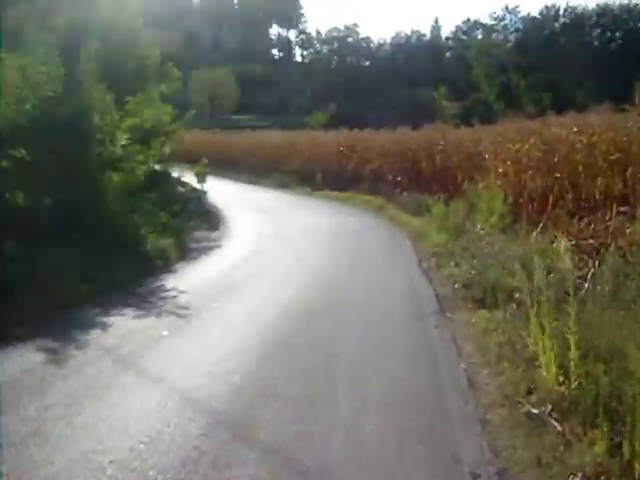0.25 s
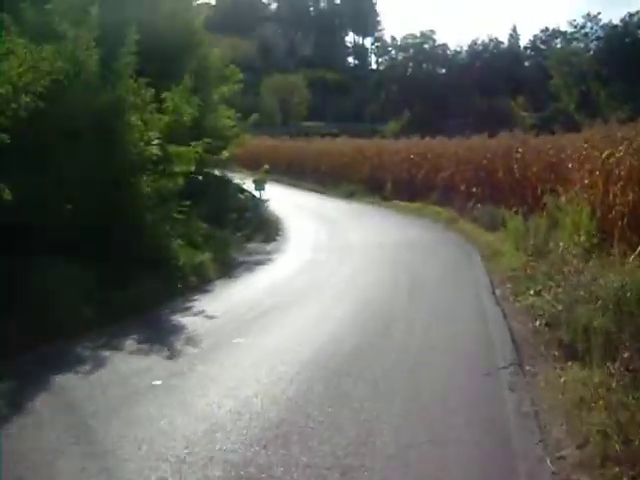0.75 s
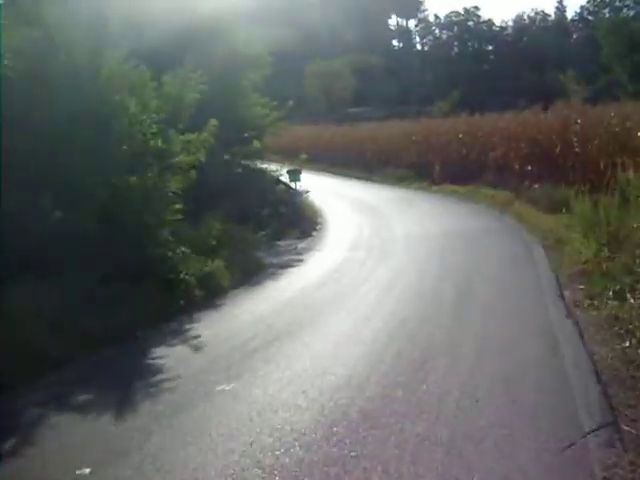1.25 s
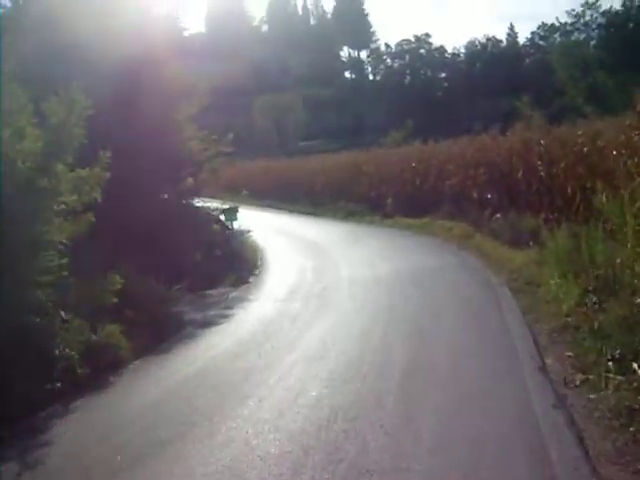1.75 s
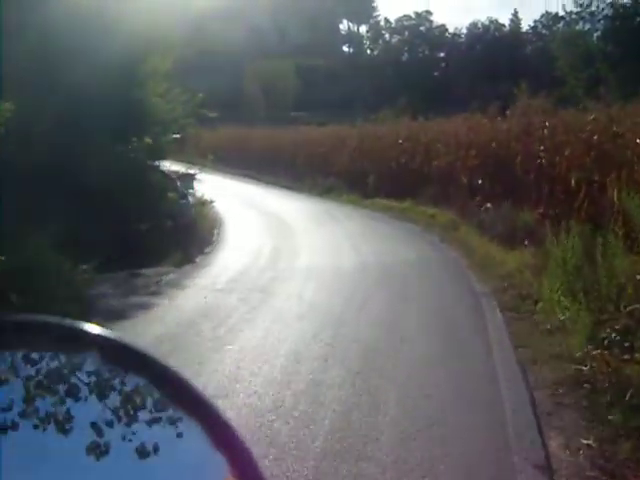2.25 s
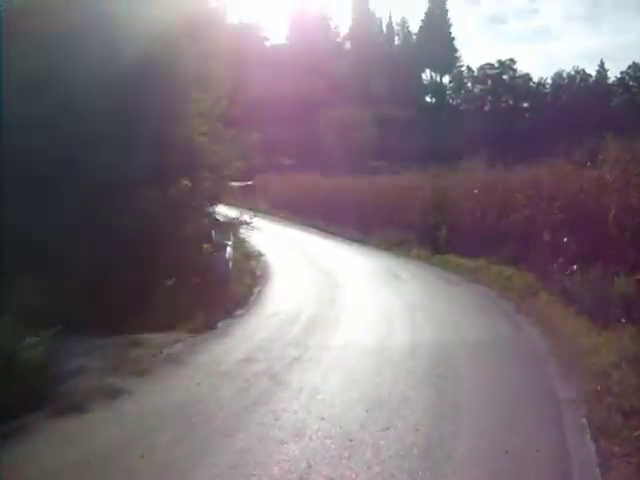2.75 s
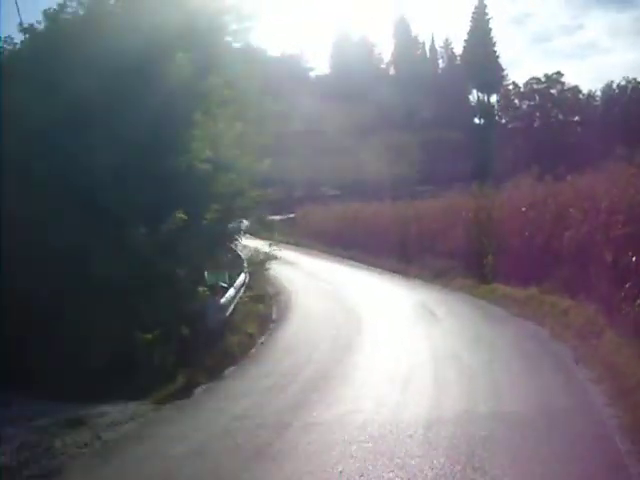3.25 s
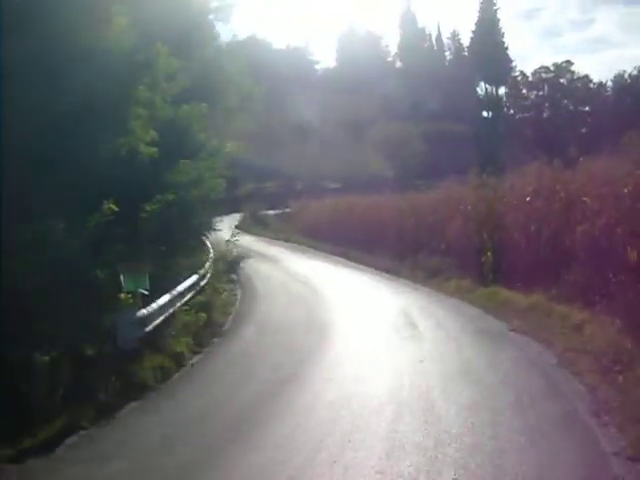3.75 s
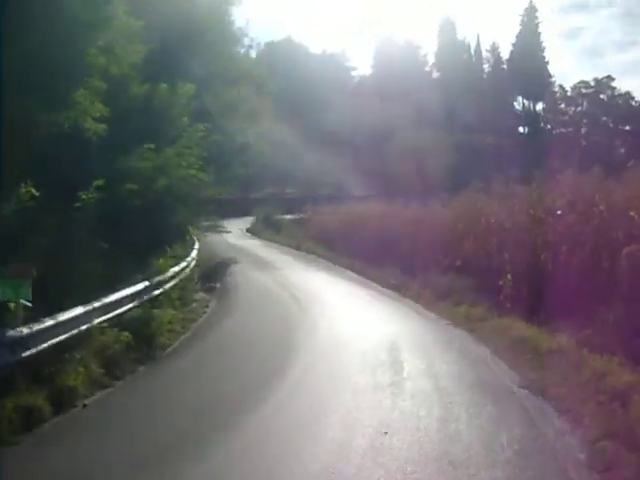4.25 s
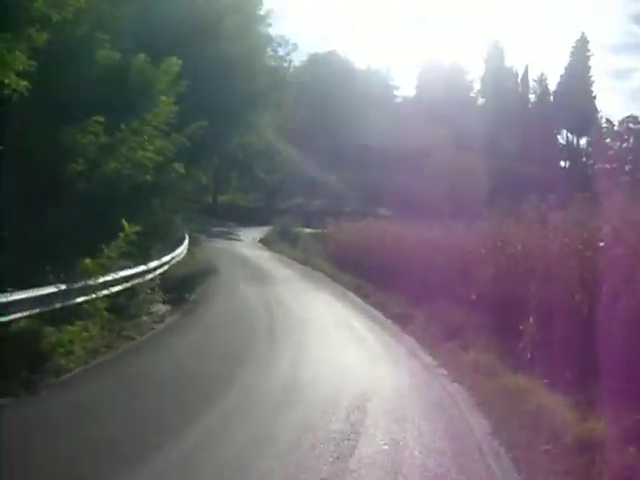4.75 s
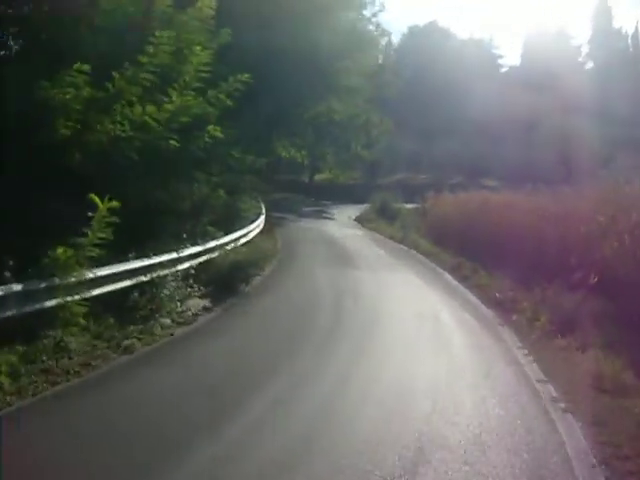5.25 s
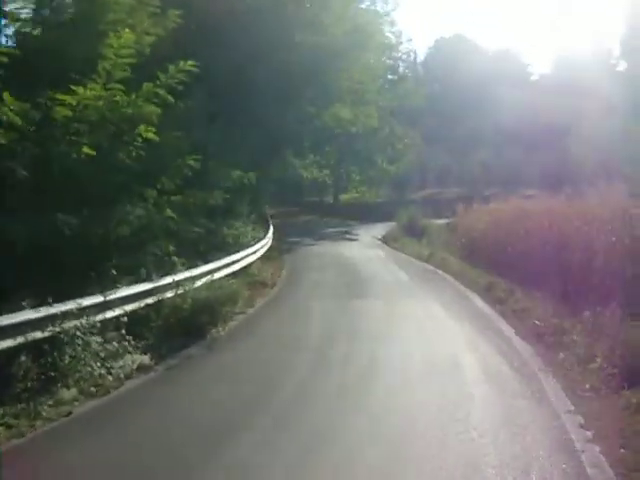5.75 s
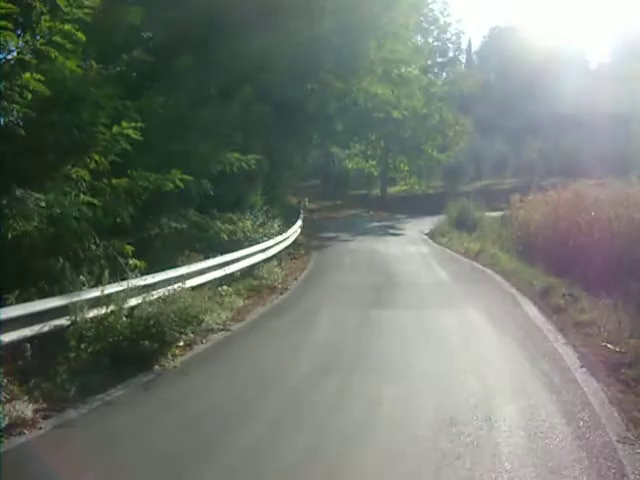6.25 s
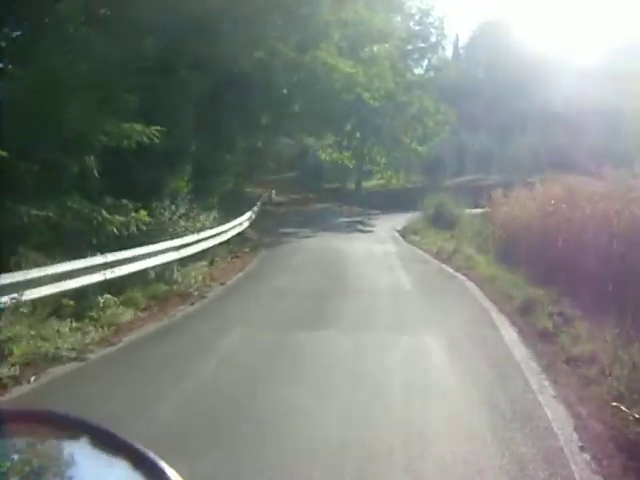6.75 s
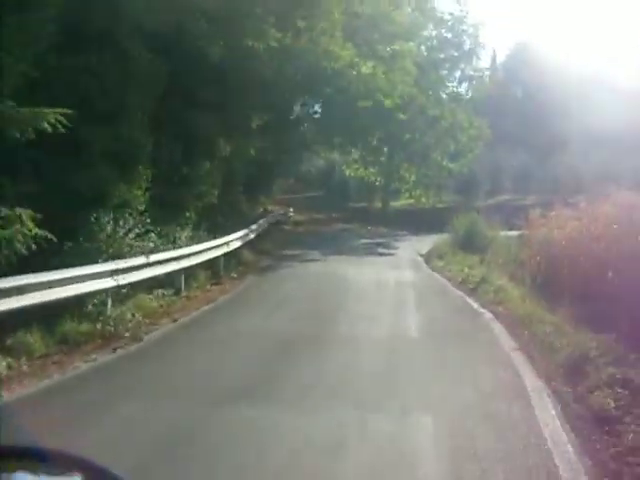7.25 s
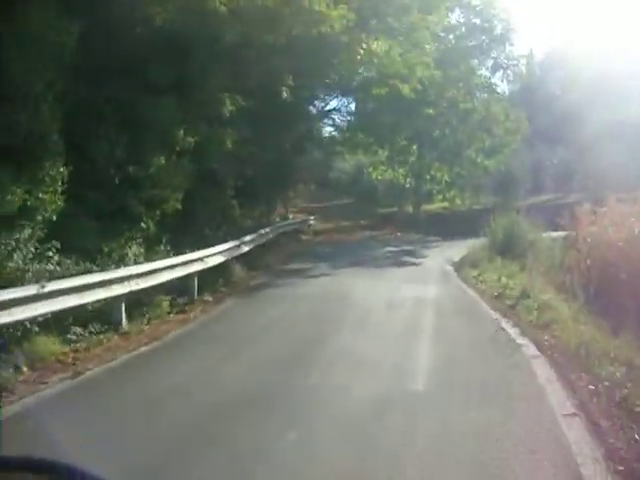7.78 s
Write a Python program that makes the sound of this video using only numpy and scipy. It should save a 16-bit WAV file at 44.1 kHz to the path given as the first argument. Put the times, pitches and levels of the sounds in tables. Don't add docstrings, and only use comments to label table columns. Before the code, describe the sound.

A small two-stroke engine drones close by on an open country road, raspy and rattling, pitch dipping slightly then rising for about four seconds before settling into a steady buzz. Gusts batter the small microphone, mostly early on, with pops and clipped rumble; two tiny bracket squeaks chirp near the start. The sound is dull, narrow and distorted, with almost no high treble.

```python
import sys
import numpy as np
from scipy import signal
from scipy.fft import rfft, irfft, next_fast_len
from scipy.io import wavfile
from scipy.ndimage import uniform_filter1d

SR = 44100
rng = np.random.default_rng(int(sys.argv[2]) if len(sys.argv) > 2 else 0)


def convert_level_to_amplitude(level_db):
    exponent = np.asarray(level_db, float) / 20
    return 10 ** exponent


def materialize(psi):
    bounded = np.clip(np.atleast_2d(psi).T, -1, 1)
    quanta = np.round(bounded * 32767).astype(np.int16)
    wavfile.write(sys.argv[1], SR, quanta)


N = 353682


def rms_one(x):
    return x / np.sqrt(np.mean(x ** 2) + 1e-20)


def evened(x, span_s):
    return rms_one(x / np.sqrt(uniform_filter1d(x ** 2, int(span_s * SR)) + 0.036))


def in_time(rows):
    s, *columns = np.transpose(rows)
    return [np.interp(np.arange(N) / SR, s, c) for c in columns]


def at_hz(points, hz):
    known_hz, level_db = np.array(points).T[:2]
    return np.interp(np.log(hz), np.log(known_hz), level_db)


def with_speed(rule, rate):
    cruise_per_s = 67
    return rule[0] + rule[1] * (rate - cruise_per_s)


def drift(rate):
    hop = 40
    r = np.exp(-2 * np.pi * rate * hop / SR)
    slow = signal.lfilter([1], [1, -2 * r, r * r], rng.standard_normal(N // hop + 2002))[2000:]
    return np.interp(np.arange(N) / hop, np.arange(len(slow)), rms_one(slow))


def coloured(spectrum, patchy_db, rate):
    size = next_fast_len(N)
    white = rfft(rng.standard_normal(size))
    hz = np.maximum(np.fft.rfftfreq(size, 1 / SR), 1)
    white = white * convert_level_to_amplitude(at_hz(spectrum, hz)) * (hz > 20)
    out = np.zeros(N)
    for centre in np.arange(4.5, 12.6, .5):
        share = np.clip(1 - 2 * np.abs(np.log2(hz) - centre), 0, 1)
        out += irfft(white * share, size)[:N] * convert_level_to_amplitude(patchy_db * drift(rate))
    return rms_one(out)


def resonate(x, hz, width_hz):
    r = np.exp(-np.pi * width_hz / SR)
    zeros = np.array([1, 0, -1]) * (1 - r * r) / 2
    poles = [1, -2 * r * np.cos(2 * np.pi * hz / SR), r * r]
    return signal.lfilter(zeros, poles, x)


def order_tones(rate, turns, wobble_db):
    # multiple of crank rate, level/dB
    ports = [(1, -20), (2, -1), (3, -5.5), (4, -13.5), (5, -13), (6, -1.5), (7, -3), (8, -10.5), (9, 0),
             (10, -8), (11, -7.5), (12, 2), (13, 0), (14, -3), (15, -8), (16, 2), (17, -4), (18, -1),
             (19, -1.5), (20, -20), (21, 3), (22, 2.5), (23, -13), (24, -17), (25, 2), (26, -6), (29, -5),
             (33, 1.5), (36, -3.5)]
    # f/Hz, gain/dB
    silencer = [(380, -1), (500, 4), (640, -4.5), (900, -7), (1040, -0.5), (1110, -11.5), (1500, -20.5),
                (2500, -9.5)]
    scatter_rad = np.maximum(with_speed((2.2, .12), rate), .85)
    out = np.zeros(N)
    uneven = .008 * drift(14)
    for k, level_db in ports:
        gain = convert_level_to_amplitude(level_db + at_hz(silencer, k * rate) + wobble_db * drift(9))
        phase = 2 * np.pi * k * (turns + uneven / np.sqrt(k))
        phase = phase + scatter_rad * (rng.standard_normal() + .35 * drift(1.71))
        out += gain * np.cos(phase)
    return out / 2


def gas_roar(turns, pulsing):
    # f/Hz, level/dB per Hz
    roar = [(30, 1.5), (90, -23), (200, -20), (330, -16), (450, 0), (700, -1), (1000, 0), (1150, -8),
            (1500, -12.5), (2200, -11), (3000, -23.5), (4500, -16.5)]
    gate = 1 + pulsing * (np.cos(6 * np.pi * turns) + .5 * np.cos(2 * np.pi * turns))
    return rms_one(coloured(roar, patchy_db=-1.0, rate=25.0) * gate)


def clatter(rate, turns, spread_db, rattle_per_s):
    # f/Hz, width/Hz, rattle level/dB, slap level/dB
    metal = [(1500, 210, -9, 9), (1950, 260, 1, 10), (2460, 320, 1.5, 22), (2810, 180, -2, 10.5),
             (3447, 240, -1.5, 12.5), (3676, 110, -4, 23)]
    slap_rule_db = with_speed((-2, -.5), rate)
    slaps = np.flatnonzero(np.diff(np.floor(turns + .3 + .03 * drift(40))) > 0)
    strength = np.clip(rng.standard_normal((len(slaps), len(metal) + 1)), -2, 1.5)
    sizes = convert_level_to_amplitude(3.6 * np.minimum(rng.exponential(1, N), 4)) * rng.choice([-1, 1], N)
    rattle = rms_one(sizes * (rng.random(N) < rattle_per_s / SR))
    throb = 1 + .3 * np.cos(4 * np.pi * turns)
    out = np.zeros(N)
    for k, (hz, width_hz, rattle_db, slap_db) in enumerate(metal):
        blows = convert_level_to_amplitude(rattle_db) * np.roll(rattle, 5000 * k) * throb
        chance_db = spread_db * (1.8 * strength[:, k] + 0.33 * strength[:, -1])
        blows[slaps] += convert_level_to_amplitude(slap_db + slap_rule_db[slaps] + chance_db)
        out += resonate(blows, hz, width_hz) / np.sqrt(width_hz)
    return rms_one(out)


def gear_whine(rate):
    mesh_teeth, clutch_lag_s = 14.55, .55
    keep = np.exp(-1 / (clutch_lag_s * SR))
    road = rate[0] + signal.lfilter([1 - keep], [1, -keep], rate - rate[0])
    waver_hz = 1.5 * drift(5)
    level_db = with_speed((-24, 1.1), road) + 1.4 * drift(1.7)
    return convert_level_to_amplitude(level_db) * np.sin(2 * np.pi * np.cumsum(mesh_teeth * road + waver_hz) / SR)


def squeaks():
    # t/s, f/Hz, length/s, level/dB
    chirps = [
        (0.726, 1547, 0.03, -25),
        (0.805, 1590, 0.032, -24),
    ]
    t, out = np.arange(N) / SR, np.zeros(N)
    for s, hz, length, level_db in chirps:
        bump = np.exp(-((t - s - length / 2) / length * 2) ** 4)
        out += convert_level_to_amplitude(level_db) * bump * np.sin(2 * np.pi * hz * t)
    return out


def wind(lumpy_db):
    # t/s, peak level/dB, width/s, brightness/dB
    gust_events = [(0.121, -21.5, 0.04, -15.5), (0.157, -13.5, 0.012, -3.5), (0.291, -12, 0.035, -8),
                   (0.346, -13.5, 0.05, -1), (0.442, -14, 0.042, -3.5), (0.509, -13.5, 0.061, 0.5),
                   (0.608, -13.5, 0.0071, -5), (0.688, -8.5, 0.0061, -0.5), (0.955, -13.5, 0.019, 2.5),
                   (1.065, -10.5, 0.011, 0.5), (1.096, -5, 0.015, 28), (1.271, -6.5, 0.046, 3.0),
                   (1.36, -6.5, 0.042, 1.5), (1.442, -14.5, 0.089, 4.5), (2.08, -19, 0.17, 0),
                   (2.275, -15.5, 0.074, 12), (2.345, -15.5, 0.11, 2), (2.432, -13.5, 0.084, 1.5),
                   (2.522, -12, 0.04, 7), (2.637, -9, 0.11, 6), (3.061, -16, 0.074, 7),
                   (3.156, -17, 0.13, 2.5), (3.296, -13, 0.088, -2.5), (3.413, -2.5, 0.12, -3.5),
                   (4.458, -15, 0.068, -5), (5.069, -16.5, 0.02, 5), (5.824, -3, 0.016, 8),
                   (5.869, -10, 0.028, 8.5), (6.918, -16, 0.021, 3.5), (7.47, -23, 0.2, 7.5)]
    # t/s, level/dB
    airflow = [(0, -26), (.7, -22), (.8, -30), (.92, -21.5), (1.3, -17.5), (1.52, -17), (1.6, -27),
               (2.0, -20.5), (2.72, -12), (2.8, -28), (3.45, -10), (3.58, -30), (4.15, -30), (4.52, -20),
               (4.66, -31), (5.9, -27.5), (7.5, -24), (8.02, -37.5)]
    # f/Hz, level/dB per Hz
    dull_spectrum = [(60, -4.5), (130, 7.5), (250, 9), (450, 1), (800, -5.5), (1500, -26.5), (4000, -41.5)]
    # f/Hz, level/dB per Hz
    bright_spectrum = [(100, -17), (300, 6), (550, 3.5), (850, 3), (1300, -6.5), (2200, -15), (4000, -27)]
    t = np.arange(0, N + 40, 40) / SR
    flow_db, = in_time(airflow)
    dull, bright = np.zeros_like(t), np.zeros_like(t)
    for s, peak_db, width, bright_db in gust_events:
        steep = np.where(t < s, 5.0, 2.5)
        power = convert_level_to_amplitude(2 * peak_db + 6.5) * np.exp(-np.abs(2 * (t - s) / width) ** steep)
        share = 1 / (1 + convert_level_to_amplitude(-2 * bright_db))
        dull += power * (1 - share)
        bright += power * share
    dull, bright = (np.interp(np.arange(N) / SR, t, p) for p in (dull, bright))
    dull = dull + convert_level_to_amplitude(2 * flow_db)
    lumps = convert_level_to_amplitude(lumpy_db * drift(86))
    gusts = np.sqrt(dull) * evened(coloured(dull_spectrum, patchy_db=0.5, rate=25.0), 0.022)
    gusts += np.sqrt(bright) * evened(coloured(bright_spectrum, patchy_db=3.0, rate=21.0), 0.017)
    force_db = 10 * np.log10(uniform_filter1d(dull, int(.06 * SR)))
    swing_db = -26.5 + 0.5 * (force_db - force_db.mean()) + 3 * drift(4.9)
    swing_db = swing_db + 0.66 * (N / 2 - np.arange(N)) / SR
    band = signal.butter(2, [14, 85], "band", fs=SR, output="sos")
    swings = signal.sosfilt(band, rng.standard_normal(N))
    return lumps * gusts + convert_level_to_amplitude(swing_db) * evened(rms_one(swings), 0.099)


def snaps():
    # t/s, crackle level/dB
    eddies = [(0.1241, -37.5), (0.3451, -32), (0.4494, -39.5), (0.4948, -41.5), (0.5611, -52),
              (0.6893, -50.5), (0.9373, -41.5), (0.9911, -59), (1.0066, -25), (1.042, -38.5),
              (1.3204, -25.5), (1.4222, -54), (1.4614, -33.5), (2.144, -39), (2.2029, -45), (2.2543, -39),
              (2.2961, -27), (2.7072, -35), (2.9562, -38), (3.036, -39.5), (3.5354, -45), (4.4174, -40.5),
              (4.4533, -32.5), (4.4922, -34), (4.5037, -38), (5.0724, -29.5), (5.899, -22.5),
              (6.9127, -22.5), (6.9765, -27.5), (7.0025, -42.5)]
    length_s = .0013
    out, chance = np.zeros(N), rng.uniform(0, 1, (len(eddies), 2))
    t = np.arange(-400, 900) / SR
    bump = np.exp(-np.where(t < 0, 9 * t ** 2, t ** 2) / length_s ** 2)
    for (s, crackle_db), (tone, side) in zip(eddies, chance):
        at = round(s * SR) + np.arange(-350, 950)
        hardness_db = crackle_db + 50
        push = convert_level_to_amplitude(.05 * hardness_db) * (1 if side < .9 else -1)
        hz = (434 + 18.5 * hardness_db) * (.8 + .4 * tone)
        out[at] += push * bump * np.cos(2 * np.pi * hz * t)
    return out


def scene():
    # t/s, crank rate/turns per s
    speed = [(0, 52.2), (.45, 50.5), (1.5, 53.4), (1.8, 54), (2.5, 59.1), (3.0, 62), (3.5, 64.2),
             (4.0, 65.7), (4.5, 66.9), (4.75, 67.25), (5.25, 67.3), (5.5, 67.1), (6.0, 67.25), (6.6, 67.6),
             (7.0, 67.3), (7.3, 67), (8.02, 66.95)]
    rate, = in_time(speed)
    turns = np.cumsum(rate) / SR + .5 + .004 * drift(3)
    warmth_db = 0.27 * (np.arange(N) - N) / SR
    engine = convert_level_to_amplitude(with_speed((-15, 0.37), rate)) * order_tones(rate, turns, wobble_db=1.5)
    engine += convert_level_to_amplitude(with_speed((-19, 0.22), rate) + warmth_db) * gas_roar(turns, pulsing=0.2)
    rattling = clatter(rate, turns, spread_db=1.0, rattle_per_s=3000)
    engine += convert_level_to_amplitude(with_speed((-24, 0.34), rate)) * rattling
    engine += .6 * (engine ** 2 - uniform_filter1d(engine ** 2, 2000))
    engine = .68 * np.tanh(engine / .68)
    return (engine + gear_whine(rate) + squeaks() + wind(lumpy_db=3.0) + snaps())[None]


def top_cut(x):
    return signal.sosfilt(signal.butter(12, 15900, fs=SR, output="sos"), x)


def record(dry):
    overload, ceiling = .698, .707
    droop = signal.butter(3, 4180, fs=SR, output="sos")
    x = signal.sosfiltfilt(droop, dry)
    x = signal.resample_poly(x, 80, 441, axis=1, padtype="edge")
    x = np.clip(x, -overload, overload)
    x = signal.resample_poly(x, 441, 80, axis=1, window=("kaiser", 6.0), padtype="edge")[:, :N]
    x = signal.sosfiltfilt(signal.cheby2(10, 38, 4883, fs=SR, output="sos"), x)
    finished = np.clip(x, -ceiling, ceiling)
    return top_cut(finished)


dry = scene()
out = record(dry)
materialize(out)
```